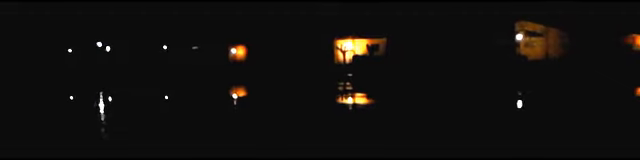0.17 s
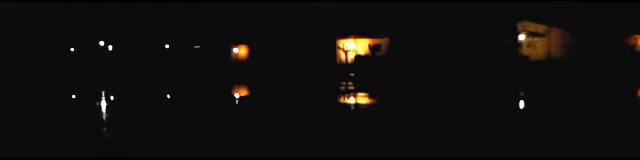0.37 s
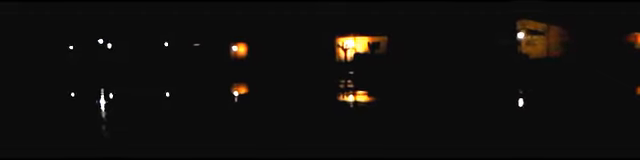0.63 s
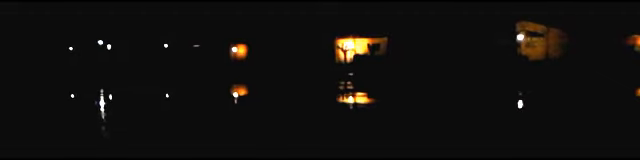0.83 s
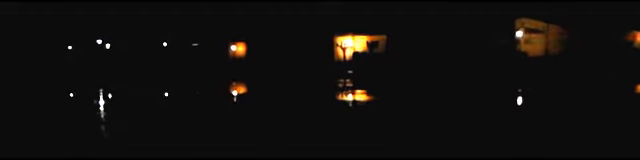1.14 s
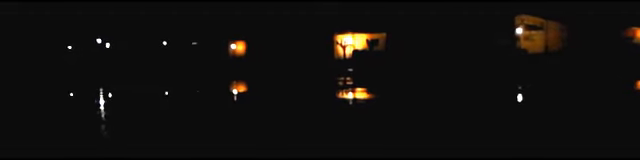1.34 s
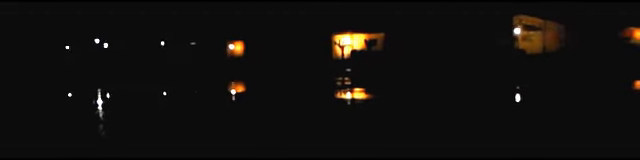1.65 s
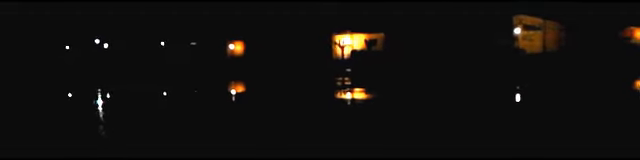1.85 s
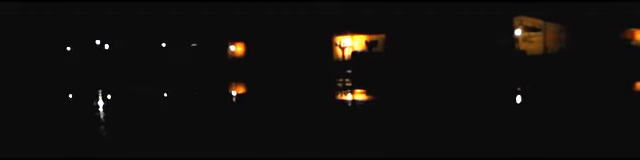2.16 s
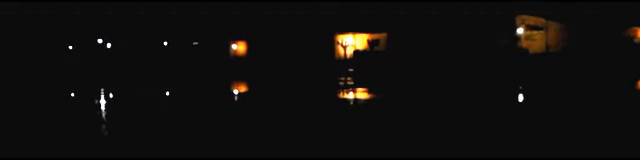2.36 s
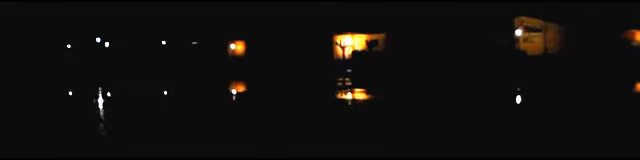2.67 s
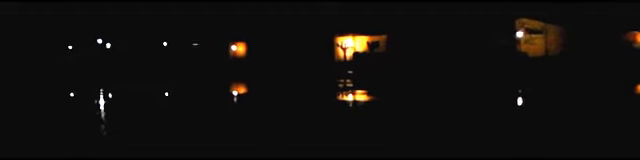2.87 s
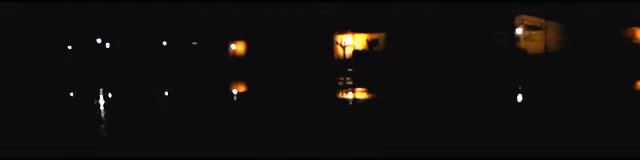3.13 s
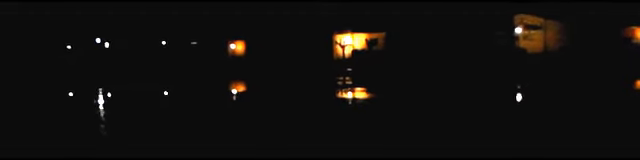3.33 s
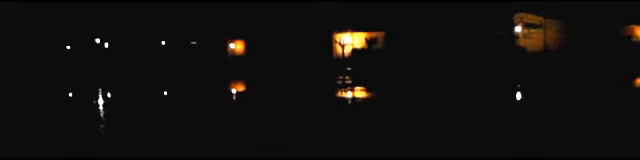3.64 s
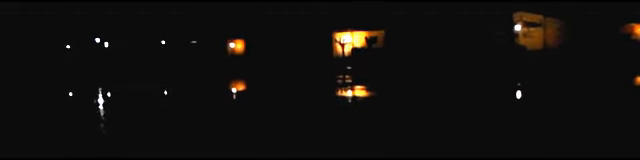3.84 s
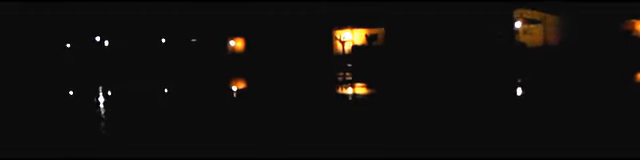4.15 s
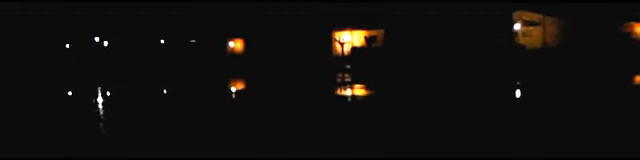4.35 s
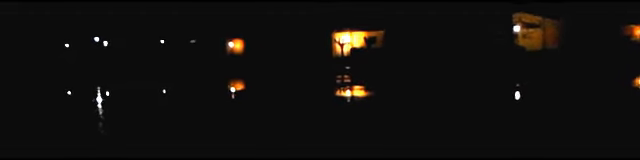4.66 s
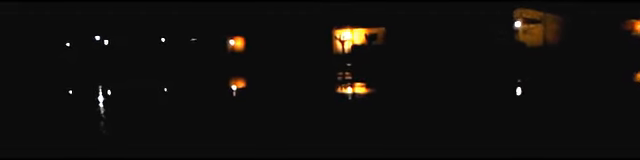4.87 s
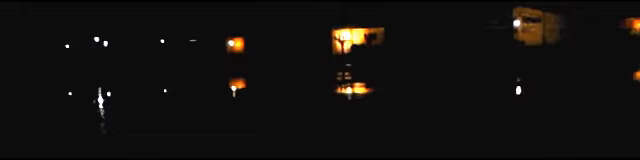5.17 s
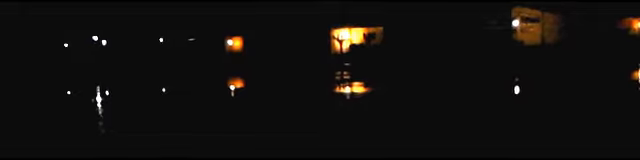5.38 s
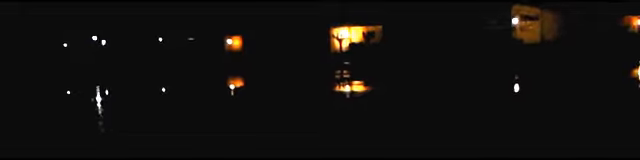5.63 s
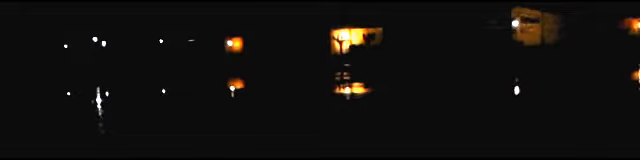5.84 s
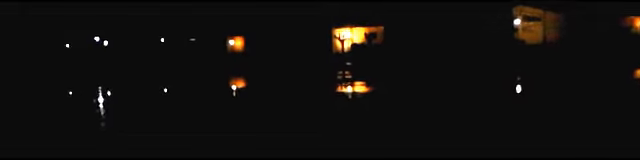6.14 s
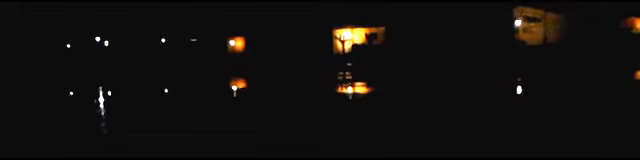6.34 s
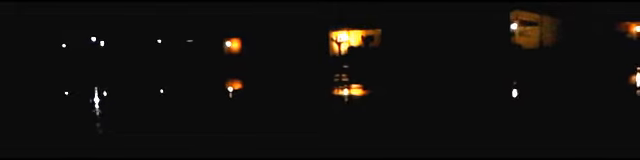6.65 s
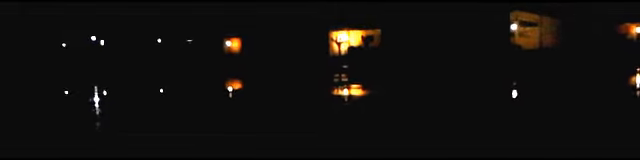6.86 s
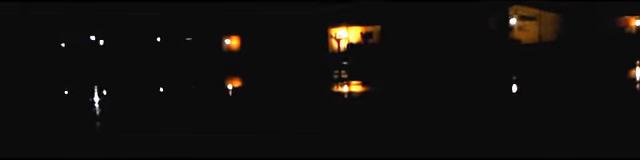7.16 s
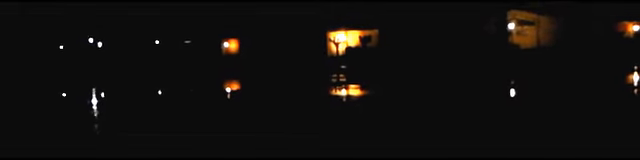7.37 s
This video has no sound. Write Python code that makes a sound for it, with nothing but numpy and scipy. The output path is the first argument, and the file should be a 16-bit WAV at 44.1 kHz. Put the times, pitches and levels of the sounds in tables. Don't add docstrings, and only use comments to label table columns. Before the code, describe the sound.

Dense night frog chorus: dry, rising, ratcheting croaks overlap without pause over faint hiss, water murmur, low wind rumble and a few dull thumps.

```python
import sys
import numpy as np
from scipy import signal
from scipy.fft import rfft, irfft
from scipy.io import wavfile
from scipy.ndimage import uniform_filter1d

SR = 44100
rng = np.random.default_rng(int(sys.argv[2]) if len(sys.argv) > 2 else 0)


def elevation(decibels):
    levels = np.asarray(decibels, float)
    return 10 ** (levels / 20)


def unload_wav(signal):
    wavfile.write(
        sys.argv[1],
        SR,
        np.round(np.clip(np.atleast_2d(signal).T, -1, 1) * 32767).astype(np.int16),
    )


N = 330750

# (multiple of click pitch, rise [ms], decay [ms], level [dB],
# pitch scatter [0-1], level per facing [dB/dB])
CLICK_MODES = [(1.0, 0.47, 1.46, -4.5, 0.0077, 2.4), (.94, 0.39, 0.62, -5, 0.064, 1.45)]


def in_time(tables):
    s, *columns = np.concatenate(tables).T
    return [np.interp(np.arange(N) / SR, s, c) for c in columns]


def coloured(spectrum, low_hz, high_hz):
    hz = np.fft.rfftfreq(N, 1 / SR) + 1e-3
    corner_hz, corner_db = np.transpose(spectrum)
    shape = elevation(np.interp(np.log(hz), np.log(corner_hz), corner_db, left=-90, right=-90))
    bins = shape * rfft(rng.standard_normal(N))
    inside = irfft(bins * ((hz > low_hz) & (hz < high_hz)), N)
    return irfft(bins, N) / np.std(inside)


def click_times(start, end, first_per_s=101.0, last_per_s=86.0):
    jitter_s = .11 / 1000
    draw = rng.standard_normal(120)
    tempo = 1 + .035 * draw[0]
    count = int((end - start) * 95 * tempo)
    gaps = 1 / np.linspace(first_per_s, last_per_s, count)
    at = start + (np.cumsum(gaps) - gaps[0]) * (end - start) / gaps.sum()
    return at + jitter_s * draw[1:count + 1], np.linspace(0, 1, count)


def add_rings(out, at, hz, gain, rise_ms, decay_ms):
    first = np.floor(at * SR).astype(int)
    span = np.arange(int((3 * rise_ms + 7 * decay_ms) * SR / 1000))
    ms = (span / SR - (at - first / SR)[:, None]).clip(0) * 1000
    swell = (1 - np.exp(-ms / rise_ms)) ** 4 * np.exp(-ms / decay_ms)
    rings = gain[:, None] * swell / swell.max() * np.sin(2 * np.pi * hz[:, None] * ms / 1000)
    summed = np.bincount((first[:, None] - first[0] + span).ravel(), rings.ravel())
    out[SR + first[0]:][:len(summed)] += summed


def over_water(x, wet_db, t60):
    s = np.arange(int(.12 * SR)) / SR
    chance = rng.random((len(x), 1, len(s)))
    echo = rng.standard_normal(chance.shape) * (chance < .03) * elevation(-60 * s / t60) * (s > .003)
    echo = echo / np.linalg.norm(echo, axis=2, keepdims=True)
    wet = signal.oaconvolve(x, echo, axes=2)[..., :N]
    return (x + elevation(wet_db) * wet).sum(0)


def self_noise():
    # (frequency [Hz], density [dB per Hz])
    self_spectrum = [(200, -13), (1500, -1), (5000, -7), (14200, -11)]
    return elevation(-73.5) * coloured(self_spectrum, 200, 5000)


def wind():
    # (time [s], level [dB])
    gusts = [(0.0, -59), (0.6, -57.5), (0.9, -56), (1.67, -63), (1.9, -54), (2.2, -63), (2.7, -57.5),
             (2.95, -62.5), (3.3, -49), (3.6, -61), (4.16, -53), (4.74, -64), (5.05, -58.5), (5.45, -67),
             (6.27, -54), (6.52, -62.5), (7.04, -50), (7.5, -54.5)]
    # (frequency [Hz], density [dB per Hz])
    rumble = [(24, -30), (32, 1.5), (48, 8.5), (86, 1.5), (95, 1), (108, -20), (140, -10.5), (180, -32),
              (310, -120)]
    # (frequency [Hz], density [dB per Hz])
    whirr = [(68, -24), (77, 4), (80.5, -9.5), (84, 5), (94, -28)]
    gust_db, = in_time([gusts])
    return elevation(gust_db + 2.6) * (coloured(rumble, 30, 130) + elevation(-7.5) * coloured(whirr, 30, 130))


def water(hiss_db):
    # (frequency [Hz], density [dB per Hz])
    murmur = [(76, -15), (130, 2), (350, -3), (523, -3), (635, -3.5), (680, -1.5), (880, -28), (1500, -120)]
    return elevation(-61.5 + 0.29 * (hiss_db + 72)) * coloured(murmur, 123, 536)


def hiss_level(main, low, click):
    power = main ** 2 + (elevation(3) * low) ** 2 + (elevation(29) * click) ** 2
    power = uniform_filter1d(power, size=3000)
    chorus_db = 10 * np.log10(np.abs(power) + 1e-9)
    return -73 + 0.42 * (chorus_db + 30)


def hiss(hiss_db):
    # (frequency [Hz], density [dB per Hz])
    middle_spectrum = [(2290, -27), (3900, -4), (4390, -5), (6710, -4), (8700, -7.5), (9800, -3.5),
                       (14270, -8.5)]
    return elevation(hiss_db) * coloured(middle_spectrum, 12250, 13820)


def side_hiss(hiss_db):
    # (frequency [Hz], density [dB per Hz])
    side_spectrum = [(1940, -81), (3300, -51), (3940, -38), (4190, -41.5), (4760, -17), (7900, -3),
                     (8610, -21), (10100, -3), (14270, -8)]
    return elevation(hiss_db - 1) * coloured(side_spectrum, 10900, 15600)


def thumps():
    # (time [s], peak level [dB], final pitch [Hz])
    knocks = [
        (4.2549, -20, 62),
        (5.629, -21, 58),
        (7.495, -33, 70),
    ]
    out, s = np.zeros(N + SR), np.arange(5000) / SR
    for start, peak_db, end_hz in knocks:
        hz = end_hz + 1150 * np.exp(-s / .00072) + 45 * np.exp(-s / .025)
        fade = np.exp(-s / .02) * (1 + .6 * np.exp(-s / .002)) * (1 - np.exp(-s / .0002))
        knock = np.sin(2 * np.pi * np.cumsum(hz) / SR) * fade
        out[int(start * SR):][:len(s)] += elevation(peak_db - 3.0) * knock
    return out[:N]


def hoots():
    # (start [s], end [s], first pitch [Hz], last pitch [Hz], peak level [dB])
    far_calls = [
        (2.99, 3.09, 490, 520, -52),
        (3.29, 3.4, 490, 510, -51),
        (3.66, 3.79, 490, 515, -50),
        (5.02, 5.14, 490, 530, -51),
        (5.34, 5.48, 470, 520, -49),
        (5.31, 5.36, 580, 620, -52),
        (6.82, 7.02, 260, 170, -53),
        (2.8, 3.65, 400, 405, -66),
    ]
    out = np.zeros(N)
    for start, end, from_hz, to_hz, peak_db in far_calls:
        along = np.linspace(0, 1, int((end - start) * SR))
        noise = rng.standard_normal(N)[:len(along)]
        waver_hz = uniform_filter1d(uniform_filter1d(noise, size=500), size=200) * 190
        hz = from_hz + (to_hz - from_hz) * along + waver_hz
        tone = np.sin(2 * np.pi * np.cumsum(hz) / SR) * elevation(waver_hz / 1.7)
        out[int(start * SR):][:len(along)] += elevation(peak_db) * np.sin(np.pi * along) ** 0.29 * tone
    return out


def glides():
    # (start [s], end [s], first pitch [Hz], last pitch [Hz], peak level [dB])
    single_glides = [(.9, .98, 9100, 8550, -40), (1.021, 1.087, 10000, 9300, -46),
                     (1.354, 1.5, 8800, 7200, -48), (1.529, 1.61, 13000, 6800, -53),
                     (1.824, 1.925, 8600, 8000, -53), (2.06, 2.27, 11000, 9200, -56),
                     (1.962, 2.04, 4700, 6600, -54), (2.58, 2.7, 8100, 6100, -54),
                     (2.893, 3.03, 9300, 8000, -53), (3.424, 3.698, 5900, 6200, -50.5),
                     (3.621, 3.715, 9600, 8900, -35.5), (3.469, 3.519, 9500, 9100, -40),
                     (4.522, 4.58, 8300, 9200, -47), (5.06, 5.204, 8200, 8200, -49),
                     (5.172, 5.3, 8700, 11000, -54), (5.88, 6.022, 10800, 11500, -51),
                     (5.941, 6.055, 6700, 7100, -47.5), (5.925, 5.99, 9000, 8800, -45),
                     (6.207, 6.316, 7700, 8200, -45.5), (6.376, 6.461, 8900, 8300, -43),
                     (5.678, 5.78, 9800, 7400, -44.5), (0.6, 0.64, 10300, 11000, -54),
                     (3.66, 3.8, 12000, 11000, -53), (4.2, 4.36, 10500, 9200, -51)]
    # (start [s], peak level [dB])
    high_glides = [(1.08, -42), (2.63, -41.5), (4.7, -46), (6.12, -43)]
    # (length [s], first pitch [Hz], last pitch [Hz])
    high_shape = (.2, 11400, 10370)
    # (start [s], peak level [dB])
    low_glides = [(1.14, -43.5), (3.58, -39)]
    # (length [s], first pitch [Hz], last pitch [Hz])
    low_shape = (.22, 7250, 6900)
    clear = list(single_glides)
    for rows, (length, from_hz, to_hz) in ((high_glides, high_shape), (low_glides, low_shape)):
        clear += [(s, s + length, from_hz, to_hz, db) for s, db in rows]
    faint = []
    for s, (a, b, c) in zip(np.linspace(0, 7.3, 60), rng.random((60, 3))):
        from_hz = 6000 + 5000 * b
        faint.append((s, s + 0.068 + 0.14 * a, from_hz, from_hz * (0.64 + 0.22 * c), -40 - 8 * a))
    out = np.zeros((2, N + 2 * SR))
    for k, (group, scatter_hz, decay_ms) in enumerate(((clear, 30, 2.4), (faint, 130, 1.5))):
        for start, end, from_hz, to_hz, peak_db in group:
            at, along = click_times(start, end, first_per_s=96.0, last_per_s=90.0)
            draw = rng.standard_normal((2, 60))[:, :len(at)]
            hz = from_hz + (to_hz - from_hz) * along + scatter_hz * draw[0]
            gain = elevation(peak_db + 3.5 + 2 * draw[1]) * np.sin(np.pi * (0.1 + .84 * along)) ** 0.9
            add_rings(out[k], at, hz, gain, .25, decay_ms)
    return out[:, SR:SR + N]


def clickers():
    # (start [s], length [s], level [dB], click pitch [Hz])
    hidden_frogs = [(-.1, 0.25, -48.5, 8700), (0.401, 0.38, -53.5, 8870), (.9, 0.46, -42, 8760),
                    (1.3, 0.44, -53, 8700), (1.79, 0.13, -44.5, 8630), (1.999, 0.29, -46.5, 8640),
                    (2.402, 0.46, -44.5, 8830), (2.901, 0.36, -51.5, 8740), (3.451, 0.48, -44.5, 8780),
                    (3.85, .52, -48.5, 8840), (4.501, 0.5, -53.5, 8700), (4.969, .3, -47, 8980),
                    (5.202, 0.36, -52.5, 8560), (5.659, 0.25, -50, 8700), (5.902, 0.54, -49.5, 8800),
                    (6.349, 0.59, -56, 9000), (7.22, 0.59, -45, 8820)]
    out = np.zeros(N + 2 * SR)
    for start, length, level_db, click_hz in hidden_frogs:
        at, along = click_times(start, start + length)
        draw = rng.standard_normal((4, 60))[:, :len(at)]
        gain = elevation(level_db + 6 + 3.5 * draw[0]) * np.sin(np.pi * (0.072 + .87 * along)) ** 0.87
        arch = 1 + .04 * (np.sin(np.pi * along) - .6) + 0.015 * draw[1]
        for chance, (ratio, rise_ms, decay_ms, db, scatter, _) in zip(draw[2:], CLICK_MODES):
            hz = ratio * click_hz * (arch + scatter * chance)
            add_rings(out, at, hz, gain * elevation(db), rise_ms, decay_ms)
    return over_water(out[None, None, SR:SR + N], wet_db=-4.5, t60=0.34)[0]


def near_croaks():
    # (start [s], length [s], middle sac pitch [Hz], level [dB], facing of low and high modes [dB])
    filling = [(-0.3, 0.41, 2100, -31, 4), (1.771, 0.48, 2075, -16.5, -3), (2.177, 0.54, 1803, -24.5, 1),
               (3.358, 0.42, 1857, -22, -6), (3.422, 0.38, 2160, -26.5, 5), (3.85, 0.53, 1794, -33.5, 4.5),
               (4.251, 0.4, 1758, -28, -2.5), (4.501, 0.45, 2124, -31.5, -8.5),
               (5.033, 0.35, 2110, -25.5, 5), (5.621, 0.44, 1872, -23.5, -5.5), (5.702, 0.45, 2290, -45, 9),
               (6.696, 0.6, 1800, -32, -1.5), (7.279, 0.53, 2090, -20, 2)]
    swelling = [(-0.1, 0.63, 1865, -26, -2.5), (0.201, 0.5, 1921, -25.5, -2),
                (0.859, 0.63, 1853, -21, -8.5), (1.099, 0.53, 2396, -30, -4.5),
                (1.797, 0.35, 2060, -21, -9), (2.849, 0.25, 1850, -38, -12),
                (3.019, 0.42, 2070.0, -15, -12), (4.35, 0.3, 2050.0, -23.5, -7.5),
                (4.817, 0.46, 1858, -29, -3.5), (5.15, 0.41, 1870, -22.5, -7), (5.948, 0.5, 2062, -22, -7),
                (6.1, 0.38, 1760, -27.5, -5.5), (6.351, 0.44, 1873, -34.5, 4),
                (6.618, 0.24, 2320, -29.5, -8), (6.849, 0.4, 2300, -32.5, -5),
                (7.019, 0.55, 1895, -25.5, -7)]
    taut = [(0.704, 0.14, 2080, -33.5, -15), (0.898, 0.46, 1992, -19, -1), (1.3, 0.48, 1940, -23, -5.5),
            (2.298, 0.53, 2300, -28, 1), (2.45, 0.45, 2008, -21, -7.5), (3.602, 0.41, 2120, -24.5, -7.5),
            (3.996, 0.43, 1947, -30, 3), (4.2, 0.39, 2510, -37, -7), (5.62, 0.33, 2504, -39, 1),
            (1.94, .31, 2140, -33.5, 9.5), (4.64, .24, 2300, -34.5, -4), (1.0, .33, 2140, -28, 2.5)]
    croaks = []
    for rows, rise in ((filling, 1.22), (swelling, 1.082), (taut, 0.97)):
        for s, length, hz, db, facing_db in rows:
            croaks.append((s, s + length, hz / np.sqrt(rise), hz * np.sqrt(rise), db, facing_db))
    return sorted(croaks)


def far_croaks():
    # (time [s], level [dB])
    far_waves = [(0, 2.5), (.4, -2), (.68, -1.5), (1.1, -1.5), (1.7, -3.5), (2.2, -3), (2.6, 1.5),
                 (2.97, -5.5), (3.5, 1), (4.1, 2), (4.75, -4), (5.2, 1), (5.56, -1.5), (6.0, 1),
                 (6.55, -3.5), (7.0, -3), (7.5, 2)]
    wave_s, wave_db = np.transpose(far_waves)
    croaks = []
    for s, (p, g) in zip(np.linspace(-.4, 7.4, 45), rng.random((45, 2))):
        db = -41 + np.interp(s + 0.16, wave_s, wave_db) + 3 * (g - .5)
        croaks.append((s, s + .45, 1750 + 300 * p, 1950 + 450 * p, db, 2))
    return croaks


def chorus():
    # (multiple of sac pitch, rise [ms], decay [ms], level [dB],
    # pitch scatter [0-1], level per facing [dB/dB])
    main_modes = [(1.0, .95, 1.9, 0, .004, 0), (1.14, .7, 1.2, -15, .008, .1)]
    low_modes = [(0.419, 1.44, 1.87, -2, 0.0057, 1.11), (0.466, 0.48, 3.73, 0, 0.0016, 1.47),
                 (0.561, 0.44, 0.72, -3.5, 0.024, 1.15), (0.66, 0.87, 0.63, -3.5, 0.059, 1.6)]
    upper_modes = [(1.515, 0.81, 0.83, -2, 0.023, 0.78), (1.58, 0.57, 0.79, -4, 0.029, 0.91),
                   (1.48, 0.75, 0.94, -7.5, 0.027, 2.3)]
    group_db = [0.5, -7.5, -17, -19.5]
    far_dull_db = [1.5, 0, 2, -9]
    late_bloom = [0.02, 0.15, 0.13, 0.47]
    groups = (main_modes, low_modes, upper_modes, CLICK_MODES)
    modes = [(k, mode) for k, group in enumerate(groups) for mode in group]
    near = near_croaks()
    out = np.zeros((2, 4, N + 2 * SR))
    for frog, (start, end, from_hz, to_hz, level_db, facing_db) in enumerate(near + far_croaks()):
        is_far = frog >= len(near)
        at, along = click_times(start, end)
        draw = rng.standard_normal((13, 120))[:, :len(at)]
        sac_hz = from_hz + (to_hz - from_hz) * along ** 0.61
        held_hz = np.sqrt(2050 * sac_hz)
        click_hz = 8854 * (1 + .02 * draw[12, 0] + .04 * (.5 - along))
        attack = np.minimum(along / 0.42 + 0.37, 1)
        release = np.minimum((1 - along) / 0.26 + 0.28, 1)
        effort = attack * release * elevation(level_db + 1.8 * draw[11])
        for chance, (k, (ratio, rise_ms, decay_ms, db, scatter, aim)) in zip(draw, modes):
            hz = ratio * (sac_hz, held_hz, sac_hz, click_hz)[k] * (1 + scatter * chance)
            late_s = (0, 0, .0008, .0016)[k]
            effort = -effort
            mode_db = db + group_db[k] + aim * facing_db + far_dull_db[k] * is_far
            gain = effort * elevation(mode_db) * (along + 0.024) ** late_bloom[k]
            add_rings(out[frog % 2, k], at + late_s, hz, gain, rise_ms, decay_ms)
    out = over_water(out[..., SR:SR + N], wet_db=-6, t60=0.16)
    lowest_mode = signal.cheby1(5, 1, 755, "high", fs=SR, output="sos")
    return signal.sosfilt(lowest_mode, out)


def scene():
    # (time [s], gain [dB])
    gate_curve = [
        [(0, 1.5), (.71, -0.4), (.74, -15), (.85, -31), (.865, -7), (.9, -0.74), (7.5, 1)],
    ]
    gate_db, = in_time(gate_curve)
    main, low, upper, click = chorus()
    click = click + clickers()
    hiss_db = hiss_level(main, low, click)
    clear, faint = glides()
    bright = click + clear + elevation(hiss_db + 55) * faint
    mid = elevation(gate_db) * (main + low + upper + bright + hoots() + thumps() + hiss(hiss_db))
    mid = mid + elevation(0.83 * gate_db) * wind() + elevation(0.73 * gate_db) * water(hiss_db)
    mid = mid + self_noise()
    side = side_hiss(hiss_db) + elevation(-15) * np.roll(bright, 150)
    side = elevation(gate_db) * side
    return np.array([mid + side, mid - side])


def roll_off(x):
    return signal.sosfilt(signal.butter(12, 15430, fs=SR, output="sos"), x)


def record(dry):
    mix = dry - .002
    return roll_off(mix)


dry = scene()
out = record(dry)
unload_wav(out)
```